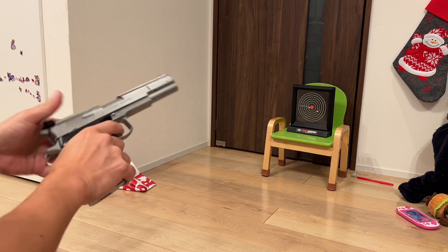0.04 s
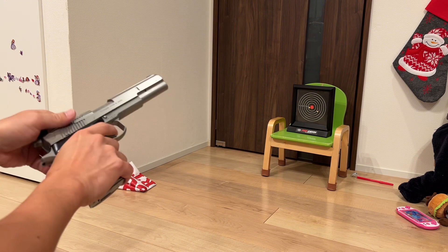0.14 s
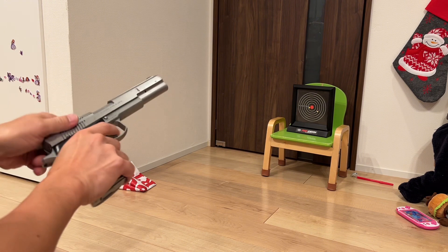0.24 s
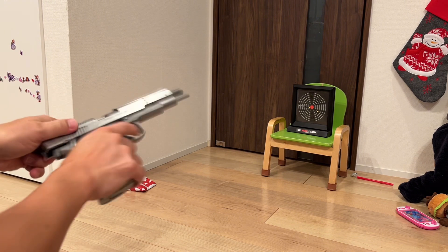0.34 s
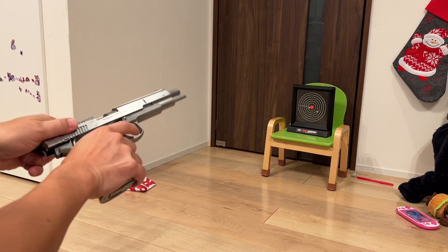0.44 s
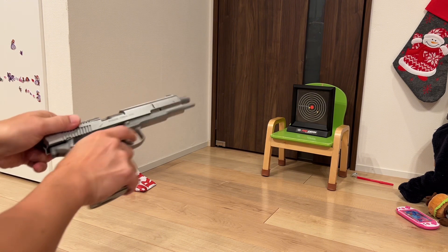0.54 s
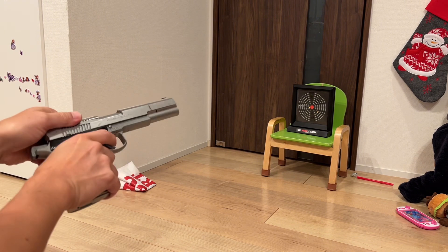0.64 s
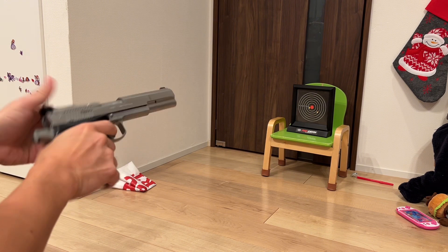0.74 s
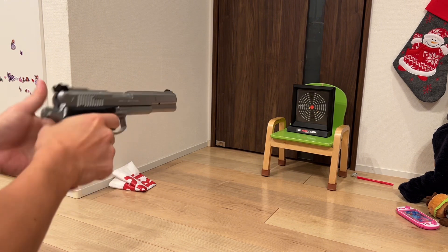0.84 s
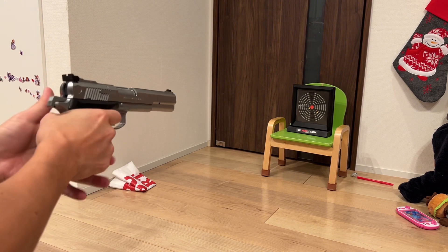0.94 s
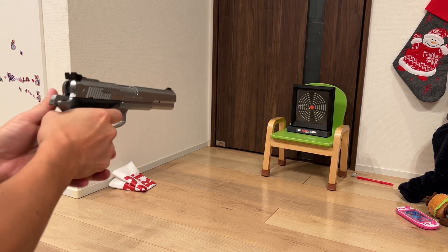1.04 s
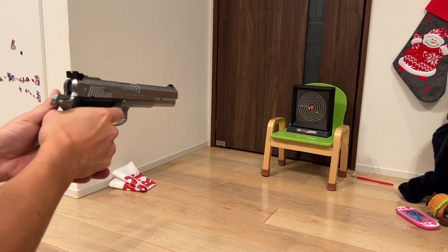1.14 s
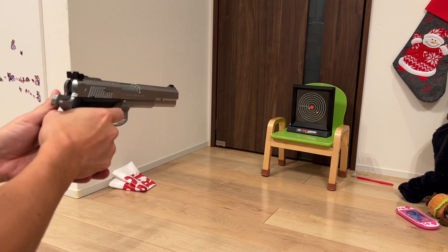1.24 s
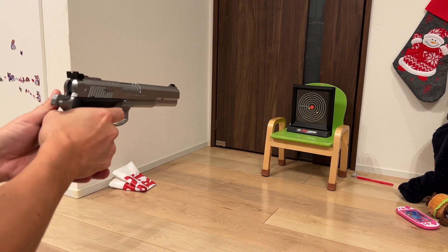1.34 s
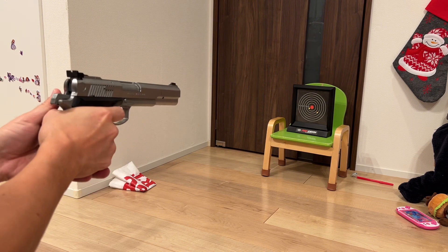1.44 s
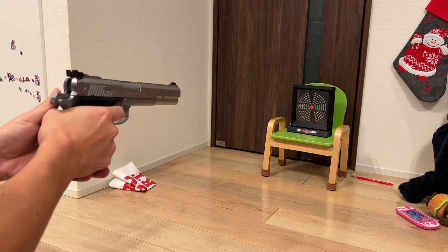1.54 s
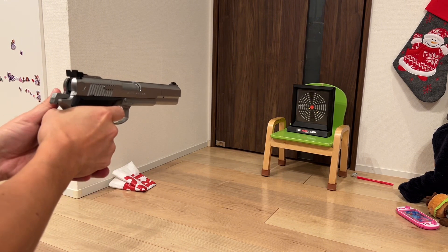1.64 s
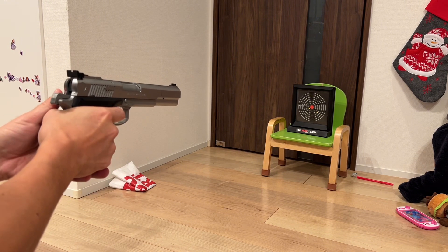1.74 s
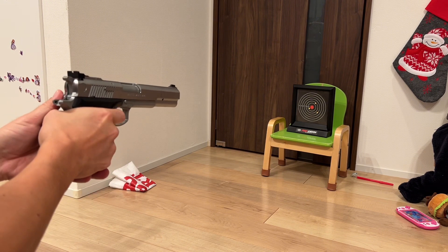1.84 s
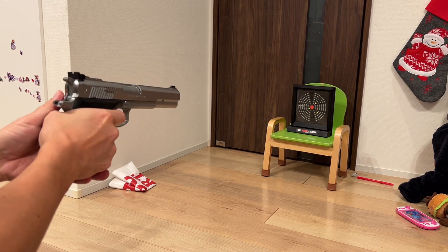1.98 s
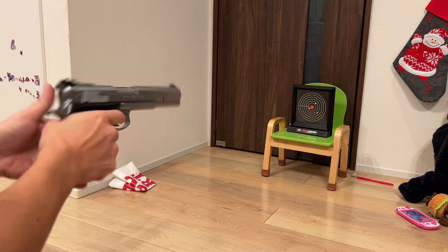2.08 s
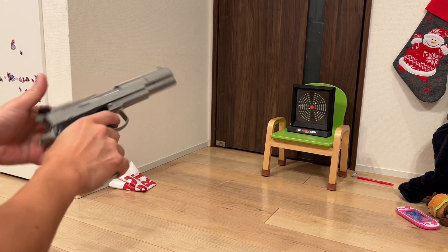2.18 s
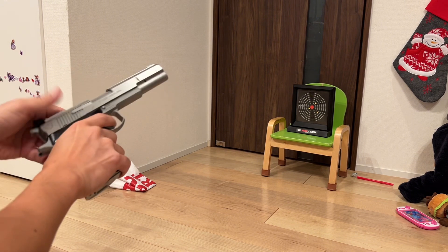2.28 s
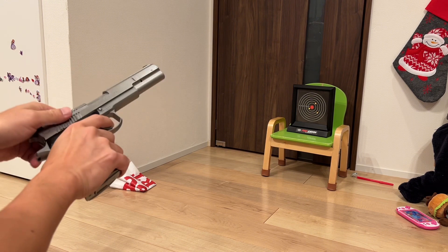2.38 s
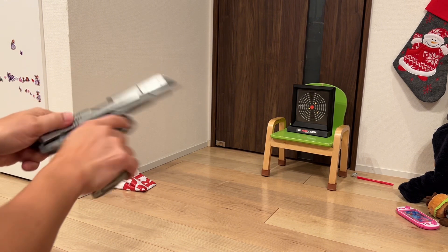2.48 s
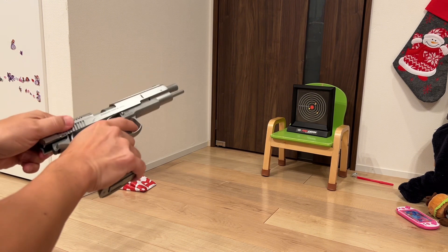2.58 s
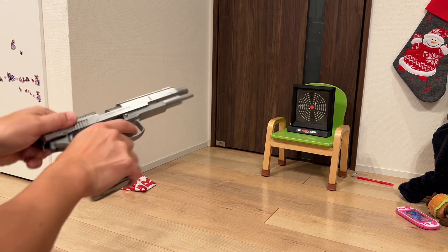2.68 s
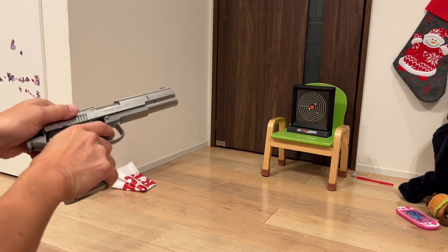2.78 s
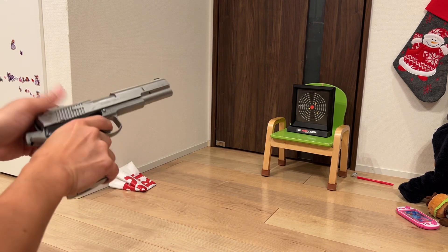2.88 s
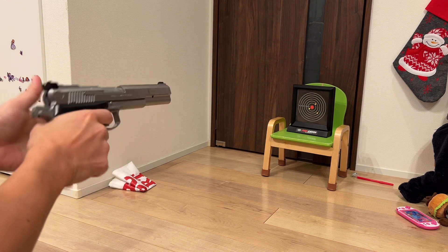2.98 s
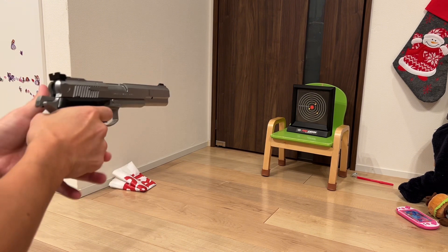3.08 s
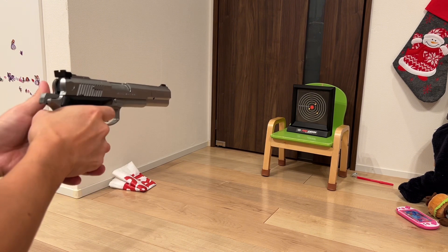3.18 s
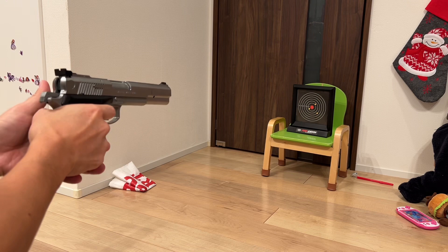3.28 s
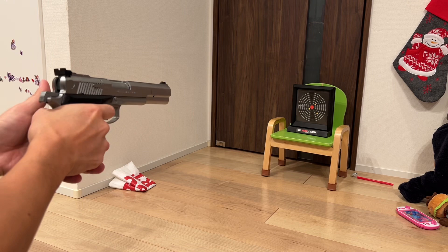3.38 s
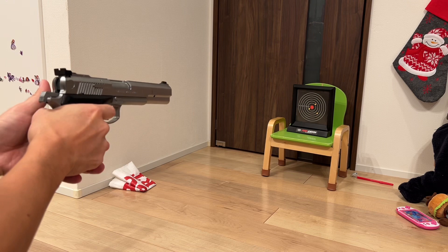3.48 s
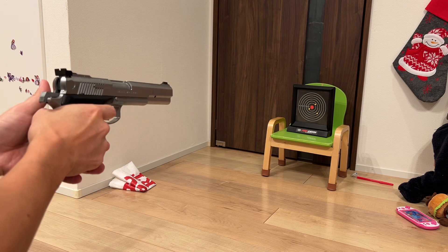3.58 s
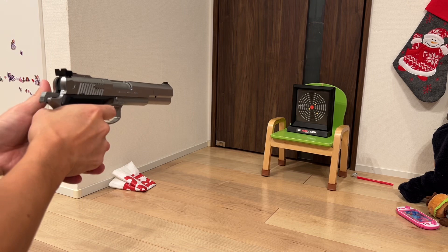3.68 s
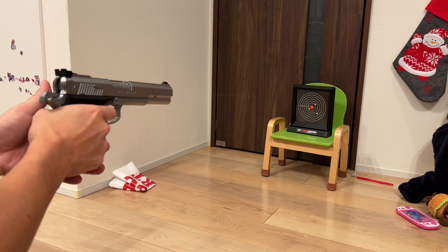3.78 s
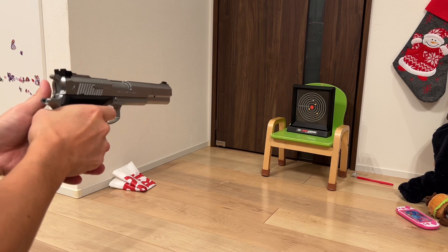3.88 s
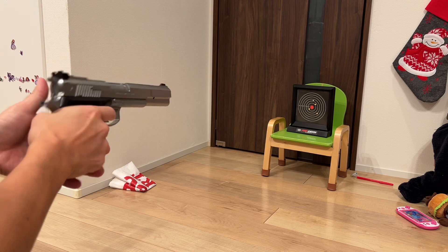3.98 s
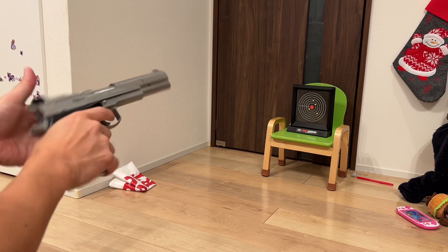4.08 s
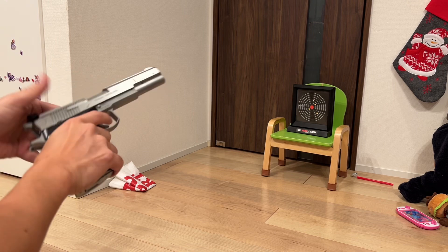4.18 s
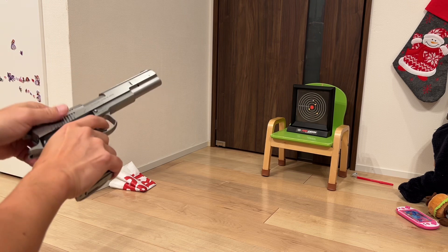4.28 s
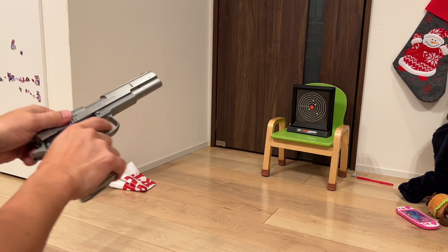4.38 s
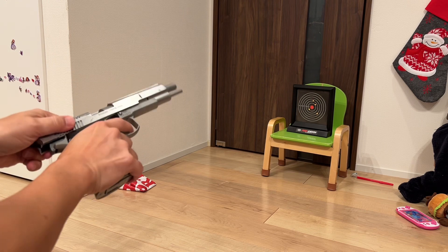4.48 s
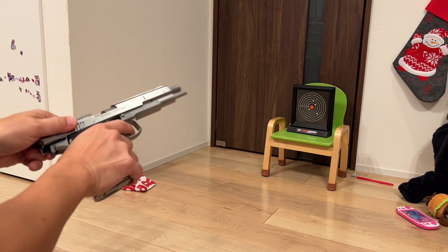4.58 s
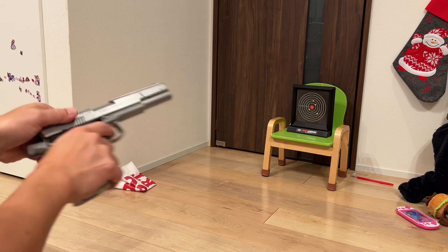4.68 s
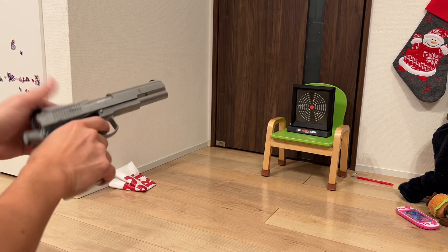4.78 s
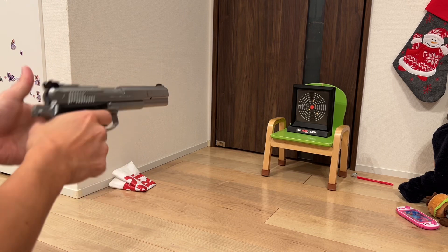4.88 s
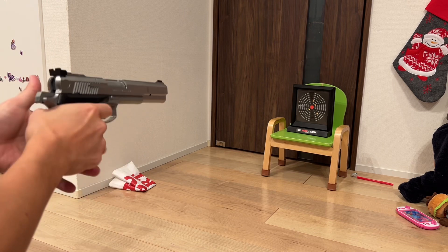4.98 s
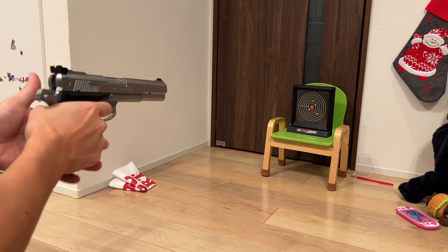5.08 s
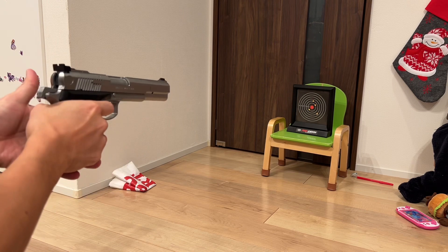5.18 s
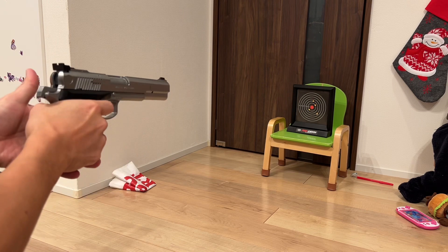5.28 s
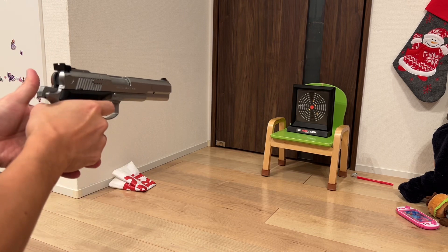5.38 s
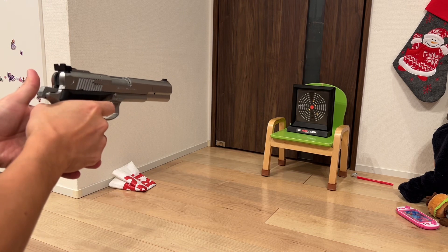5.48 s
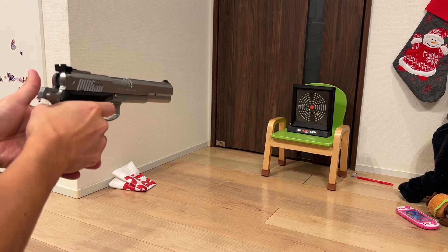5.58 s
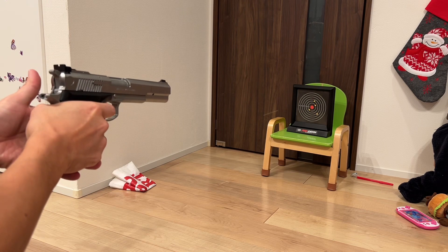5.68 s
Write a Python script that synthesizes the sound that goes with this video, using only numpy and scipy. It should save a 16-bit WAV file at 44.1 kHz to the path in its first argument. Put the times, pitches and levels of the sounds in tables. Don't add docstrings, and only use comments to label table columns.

```python
import sys
import numpy as np
from scipy import signal
from scipy.fft import rfft, irfft
from scipy.io import wavfile
from scipy.ndimage import uniform_filter1d

SR = 44100
rng = np.random.default_rng(int(sys.argv[2]) if len(sys.argv) > 2 else 0)


def voltage_ratio(decibels):
    exponent = np.asarray(decibels, float) / 20
    return 10 ** exponent


def master_out(mix):
    frames = np.transpose(np.atleast_2d(mix))
    ceiling = np.clip(frames, -1, 1)
    pcm = np.round(ceiling * 32767).astype(np.int16)
    wavfile.write(sys.argv[1], SR, pcm)


N = 252693

# (pitch_hz, level_db over the broad crack, t60_s)
SLIDE_MODES = [
    [(738, 2, 0.016), (834, -10.5, .012)],
    [(1394, 0.72, 0.007), (2070, 1.2, 0.0056), (2672, 0.38, 0.0023)],
    [(3740, -7, 0.003), (5170, -10, 0.0022)],
    [(7800, 3.3, 0.00064), (11200, 0.31, 0.0075), (15600, 2.6, 0.0023)],
]
# (low_hz, high_hz)
SLIDE_RANGE = [
    (350, 870),
    (1000, 2380),
    (3200, 9990),
    (7000, 15470),
]
# (pitch_hz, likeness 0 to 1)
LIKENESS = [(40, 0.93), (130, .93), (290, 0.67), (640, 0.28), (1400, 0.2), (3000, 0.079), (7000, 0.19)]


def rms_one(x):
    return x / np.sqrt(np.mean(x ** 2) + 1e-20)


def at_hz(points, hz):
    table_hz, values = np.transpose(points)
    return np.interp(np.log(hz), np.log(table_hz), values)


def ring(push, hz, t60):
    r = voltage_ratio(-60 / (t60 * SR))
    w = 2 * np.pi * hz / SR
    return signal.lfilter([0, np.sin(w)], [1, -2 * r * np.cos(w), r * r], push + 1e-18)


def resonance(x, hz, t60):
    return signal.lfilter(*signal.iirpeak(hz, hz * t60 * np.pi / np.log(1000), fs=SR), x)


def bands():
    edges = 22 * 2 ** np.arange(0, 9.6, 1 / 3)
    return [(np.sqrt(low * high), signal.butter(2, [low, high], "band", fs=SR, output="sos"))
            for low, high in zip(edges, edges[1:])]


def pair(mid, side, alike):
    alike = np.clip(alike, 0, 1)
    opposite = side * np.array([[1], [-1]])
    return np.sqrt((1 + alike) / 2) * mid + np.sqrt((1 - alike) / 2) * opposite


def by_part(rows):
    bright_share = [-0.43, -.65, 0.39, 0.99]
    rows = np.array(rows)
    levels_db = rows[:, 1:2] + rows[:, 2:3] * bright_share
    return np.column_stack([rows[:, 0], levels_db])


def contacts(rows, parts, ranges, rattle_s, part_db, lead_s, after_db):
    # (lowest_hz of the part, likeness 0 to 1)
    near_likeness = [(500, .93), (1000, 0.11), (3000, .3)]
    rows, out = np.array(rows), np.zeros((2, N))
    at = np.maximum((rows[:, 0] - lead_s) * SR, 0).astype(int)
    blows = rng.standard_normal((2, N)) * voltage_ratio(1.5 * rng.standard_normal(N))
    slow = np.exp(-1 / (0.0075 * SR))
    for p, (modes, edges) in enumerate(zip(parts, ranges)):
        r = np.exp(-1 / (rattle_s[p] * SR))
        hits = np.zeros(N) + 1e-18
        hits[at] = voltage_ratio(rows[:, 1 + p] + part_db[p])
        force = signal.lfilter([1 - r], [1, -2 * r, r * r], hits)
        force += voltage_ratio(after_db) * signal.lfilter([1], [1, -slow], hits)
        part_filter = signal.butter(2, edges, btype="band", fs=SR, output="sos")
        crack = signal.sosfilt(part_filter, force * blows)
        rings = sum(voltage_ratio(level_db) * resonance(crack, hz, t60) for hz, level_db, t60 in modes)
        out += pair(*(crack + rings), at_hz(near_likeness, edges[0]))
    return out


def shots():
    # (start_s, strength_db, brightness_db, stretch of the lags)
    trigger_pulls = [
        (1.8040, 0.96, 0.8, 1.005),
        (3.7698, 0.9, 0.8, 1.04),
        (5.6234, 1.04, 0.8, .985),
    ]
    # (lag_s, thud_db, shell_db, click_db, tick_db)
    stages = [
        (0, -15, -5, -12, -3.5),
        (.0025, -6, -4.5, -3.5, -3.5),
        (.008, -4, -12.5, -19.5, -15),
        (.020, -23.5, -17.5, -24, -19.5),
        (0.0349, -25, -14, -26, -16),
        (.038, -10.5, -15.5, -31.5, -22),
        (.044, -27, -13, -12, -8.5),
    ]
    # (pitch_hz, level_db over the broad crack, t60_s)
    shot_modes = [
        [(149, -0.5, 0.2), (710, 8.5, 0.026)],
        [(1190, 10.5, 0.015), (1490, -1.5, 0.063)],
        [(3570, 0, .006), (4000, -1, .006), (5900, -1, .008)],
        [(8400, 1, 0.0016), (10800, -8.5, 0.0036)],
    ]
    # (low_hz, high_hz)
    shot_range = [
        (110, 1500),
        (1000, 3300),
        (3300, 5200),
        (7000, 21000),
    ]
    runs = []
    for shot, row in zip(by_part(trigger_pulls), trigger_pulls):
        runs.append(shot + np.array(stages) * [row[3], 1, 1, 1, 1])
    return contacts(np.vstack(runs), shot_modes, shot_range, rattle_s=[0.0014, 0.0013, 0.0015, 0.0014],
                    part_db=[14.37, 12.0, 11.34, 5.9], lead_s=0.002, after_db=-27.0)


def slide():
    # (start_s, strength_db, brightness_db)
    pull = [(.289, -26.5, 0), (.2954, -30.5, -3), (.3021, -17, 5), (.3115, -19, -10), (.3173, -17, 6),
            (.3231, -21, -8.5), (.3274, -17, 5.5), (.338, -8, 8), (2.4456, -26.5, -1), (2.456, -18, 2),
            (2.4631, -20.5, -3), (2.4686, -14, 5.5), (2.4752, -20.5, 2), (2.4798, -22.5, -9), (2.49, -8, 7),
            (2.505, -31, -0.5), (4.3873, -27, -2.5), (4.3976, -23, 3), (4.4035, -17, 2),
            (4.4134, -10.5, -1), (4.419, -17.5, 8.5), (4.4237, -17, 2.5), (4.4293, -11.5, 9.5)]
    # (start_s, strength_db, brightness_db)
    run_forward = [(0.5321, -26.5, 4.5), (0.5405, -24.5, 2), (.5494, -19, 6), (0.5589, -24, 4.5),
                   (0.565, -22, 3), (0.5712, -19, 15), (0.5773, -22.5, -1), (.582, -12.5, 1),
                   (0.5982, -19, -14.5), (0.6115, -25, -6.5), (2.649, -20.5, 6), (2.6838, -21, 13),
                   (2.691, -21.5, 4.4), (2.7027, -19.5, 5.5), (2.7075, -18.5, 4.5), (2.7165, -15.5, 6),
                   (2.722, -8.5, -3), (2.7333, -16.5, -4), (2.7429, -24, -6), (4.618, -23.5, 6.5),
                   (4.6297, -13.5, 9), (4.6403, -18.5, 12), (4.6485, -22, -6), (4.6563, -17.5, 8.5),
                   (4.661, -17, -9), (4.6814, -19, -9.5), (4.6875, -25.5, 0.5), (4.696, -31.5, -13)]
    return contacts(by_part(np.vstack([pull, run_forward])), SLIDE_MODES, SLIDE_RANGE,
                    rattle_s=[0.001, 0.0019, 0.001, 0.00064], part_db=[7.8, 10.1, 12.15, 5.4],
                    lead_s=0.0007, after_db=-17.5)


def spring():
    # (start_s, level_db)
    stops = [
        (.597, -5),
        (2.735, -5),
        (4.68, -6),
    ]
    # (pitch_hz, level_db, t60_s)
    spring_modes = [(2030, -29, .45), (2160, -32, .4), (3000, -30, .45), (3350, -36, .42)]
    flutter_hz, steady = 130, 0.4
    start_s, stop_db = np.transpose(stops)
    force, out = np.zeros(N), 0
    force[(start_s * SR).astype(int)] = voltage_ratio(stop_db)
    count = int(N / SR * flutter_hz)
    for hz, level_db, t60 in spring_modes:
        flutter = np.interp(np.arange(N), np.linspace(0, N, count), rng.standard_normal(count))
        out = out + voltage_ratio(level_db) * (steady + flutter) * ring(force, hz, t60)
    return out


def pings():
    # (start_s, peak_db, pitch_hz, t60_s)
    small_parts = [(.0214, -40.5, 3594, .02), (0.13, -48, 1200, .02), (.317, -14, 4700, 0.014),
                   (.338, -4.5, 5120, .015), (0.574, -12, 8550, .008), (.597, -14.5, 2890, 0.022),
                   (2.133, -30.5, 3600, 0.016), (2.148, -42, 900, 0.029), (2.161, -35.5, 1080, .02),
                   (2.1597, -53, 6150, .25), (2.3558, -54, 2658, .03), (2.4456, -25, 2683, .025),
                   (2.476, -18, 2745, .03), (2.735, -10, 2176, 0.022), (4.6298, -14, 4440, .008),
                   (4.661, -15.5, 3070, 0.011), (4.68, -12.5, 1918, 0.032), (4.681, -17.5, 3070, .012)]
    out = np.zeros(N)
    for start_s, peak_db, hz, t60 in small_parts:
        blow = np.zeros(N)
        blow[int(start_s * SR)] = voltage_ratio(peak_db)
        out += ring(blow, hz, t60)
    return out


def handling():
    # (start_s, strength_db, brightness_db)
    taps = [(.0019, -45.5, -13), (.0214, -45, -4.5), (.077, -57, 3.5), (.1275, -48.5, -6.5),
            (.1645, -52.5, -0.5), (.2645, -49, -3.4), (.279, -39, -5.5), (.4943, -30, 5), (.75, -39.5, 3),
            (1.7727, -41.5, -1.5), (2.134, -47.5, -1.5), (2.1475, -40, -13.5), (2.1597, -30.5, 2),
            (2.2755, -60, -6.5), (2.3558, -58, 5), (2.4346, -36, -7), (3.2124, -58, 2.5),
            (3.7475, -33.5, -3), (4.1825, -59.5, -3.5), (4.232, -52, -6), (4.2892, -59, -7.5),
            (4.3598, -57, -16.5), (4.3754, -35.5, -7.5), (4.5685, -33, 10.5), (5.6051, -35.5, -4)]
    return contacts(by_part(taps), SLIDE_MODES, SLIDE_RANGE,
                    rattle_s=[0.0014, 0.00036, 0.00037, 0.00065], part_db=[3, 12, 13.4, 0.2],
                    lead_s=0.0012, after_db=-19.5)


def rustle():
    # (peak_s, level_db)
    rubs = [(0, -54.5), (.12, -70.5), (.26, -64.5), (1.801, -50), (2.169, -51.5), (2.42, -71), (3.768, -48),
            (4.24, -66), (4.371, -69.5), (5.621, -51)]
    rise_db_per_s, fall_db_per_s = 449, 235
    t = np.arange(N) / SR
    level = 0
    for peak_s, level_db in rubs:
        drop_db = np.maximum((peak_s - t) * rise_db_per_s, (t - peak_s) * fall_db_per_s)
        level = level + voltage_ratio(level_db - drop_db)
    grains = rng.standard_normal((2, N)) * voltage_ratio(3.0 * np.minimum(rng.exponential(1, N), 4))
    grains = signal.sosfilt(signal.butter(1, [800, 8000], "band", fs=SR, output="sos"), grains)
    return rms_one(grains) * level


def room(x):
    # (pitch_hz, t60_s)
    room_t60 = [(100, 0.6), (300, 0.37), (800, 0.47), (2000, 0.44), (5000, 0.46), (9000, 0.38),
                (15000, 0.083)]
    # (pitch_hz, level_db)
    room_colour = [(100, -18.5), (400, -22), (1500, -14), (4000, -18), (8000, -19), (11500, -16),
                   (15000, -24.5)]
    t = np.arange(int(0.7 * SR)) / SR
    white, echo = rng.standard_normal((2, 2, 2, len(t))), 0
    for k, (hz, sos) in enumerate(bands()):
        mid, side = signal.sosfilt(sos, white[k % 2])[:, :, None]
        bend_db = 13.0 * hz / (hz + 2500) * (t / 0.37) ** 5
        decay = voltage_ratio(at_hz(room_colour, hz) - 60 * t / at_hz(room_t60, hz) - bend_db)
        echo = echo + pair(mid, side, at_hz(LIKENESS, hz)) * decay
    swell = 1 - np.exp(-(t / 0.001) ** 2)
    echo = echo * swell * voltage_ratio(-23.0)
    return signal.fftconvolve(x[:, None], echo, axes=2).sum(axis=0)[:, :N]


def air():
    # (pitch_hz, level_db per Hz)
    air_colour = [(20, -41), (36, -11), (123, -5), (149, -12), (185, -11), (264, -16.5), (468, -21),
                  (615, -21), (901, -23.5), (1510, -35.5), (4050, -53.5), (7580, -49), (10200, -61.5),
                  (12700, -55), (15000, -85)]
    # (time_s, level_db)
    air_level = [(0.0, -47), (0.56, -52.5), (1.91, -47), (2.74, -52.5), (3.13, -49.5), (3.94, -49),
                 (4.66, -50.5), (5.73, -48)]
    white, out = rng.standard_normal((2, 2, N + SR)), 0
    for k, (hz, sos) in enumerate(bands()):
        waver = np.interp(np.arange(N), np.linspace(0, N, 30), rng.standard_normal(30))
        noise = signal.sosfilt(sos, white[k % 2])[:, SR:]
        out = out + pair(*noise, at_hz(LIKENESS, hz)) * voltage_ratio(at_hz(air_colour, hz) + 0.5 * waver)
    time_s, level_db = np.transpose(air_level)
    return rms_one(out) * voltage_ratio(np.interp(np.arange(N) / SR, time_s, level_db) + 1.0)


def hum():
    return voltage_ratio(-54) * rms_one(ring(rng.standard_normal(N), hz=123, t60=0.18))


def hiss():
    treble = signal.butter(4, 7270, "high", fs=SR, output="sos")
    return voltage_ratio(-75.5) * signal.sosfilt(treble, rng.standard_normal(N))


def scene():
    pistol = shots() + slide() + spring() + pings() + handling() + rustle()
    return pistol + room(pistol) + air() + hum() + hiss()


def top_cut(x):
    return signal.sosfilt(signal.butter(12, 16470, fs=SR, output="sos"), x)


def record(dry):
    # (pitch_hz, level_db)
    lean = [(60, 2), (200, 3.5), (700, 3), (1300, 2), (2400, 5), (5000, 6.5), (7000, 9), (8000, -7)]
    # (pitch_hz, width_hz, depth_db)
    treble_dips = [(10310, 450, 4), (14400, 740, 8.0)]
    port_hz, port_zero_hz, port_lag_s = 7800, 8500, 1 / 3500
    hz = np.fft.rfftfreq(N, 1 / SR) + 1e-3
    dips_db = sum(depth_db * np.exp(-((hz - dip_hz) / width) ** 2) for dip_hz, width, depth_db in treble_dips)
    lean_db = at_hz(lean, hz) / 2 * np.array([[1], [-1]])
    left, right = rfft(dry) * voltage_ratio(lean_db - dips_db)
    shared = 0.85 / (1 + (port_hz / hz) ** 40)
    early = np.exp(2j * np.pi * (hz - port_zero_hz) * port_lag_s)
    right = (1 - shared) * right + shared * left * early
    x = irfft(np.array([left, right]), N)
    over_db = np.maximum(20 * np.log10(np.abs(x).max(axis=0) + 1e-9) + 0.88, 0)
    ramp = 900 * np.arange(N) / SR
    held_db = np.maximum.accumulate(over_db + ramp) - ramp
    x = x * voltage_ratio(-uniform_filter1d(held_db, size=64))
    x = signal.sosfilt(signal.cheby2(12, 70, 16500, fs=SR, output="sos"), x)
    return top_cut(np.clip(x, -1, 1))


dry = scene()
out = record(dry)
master_out(out)
```